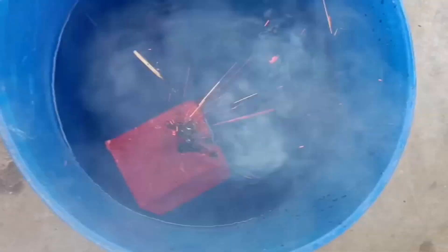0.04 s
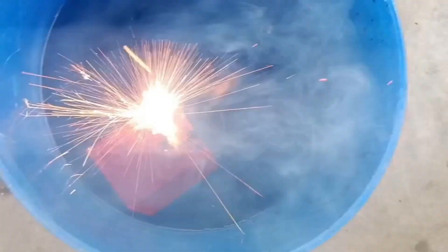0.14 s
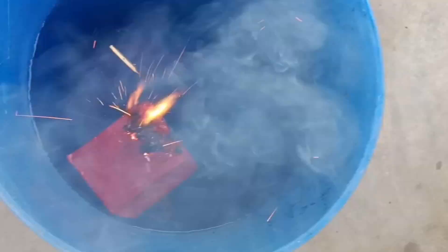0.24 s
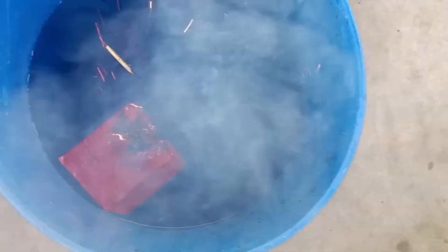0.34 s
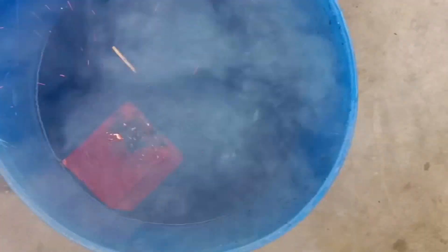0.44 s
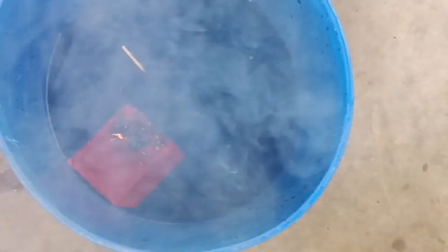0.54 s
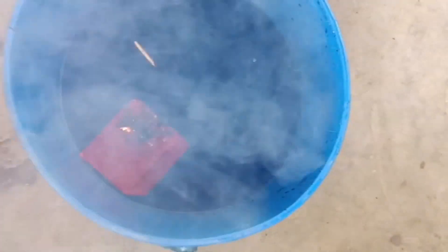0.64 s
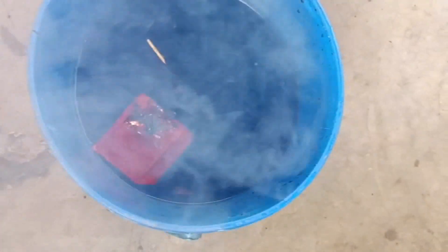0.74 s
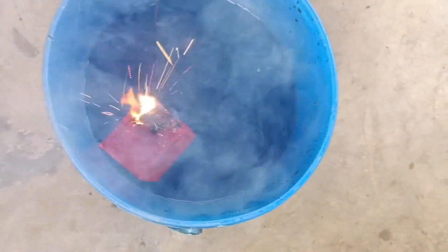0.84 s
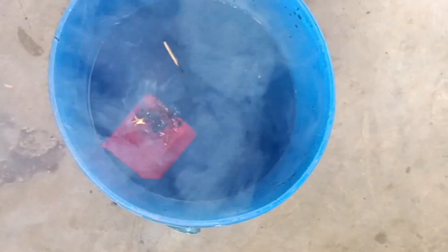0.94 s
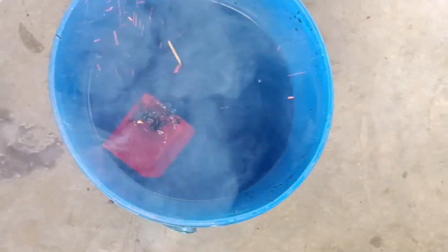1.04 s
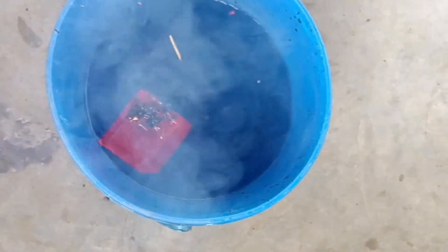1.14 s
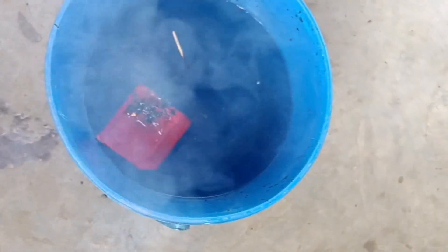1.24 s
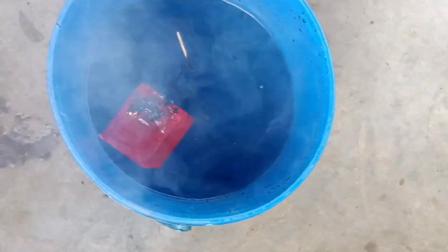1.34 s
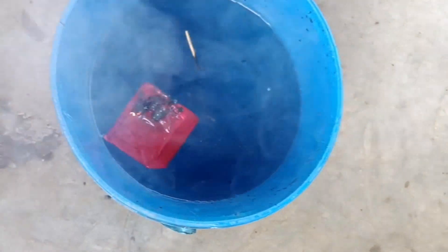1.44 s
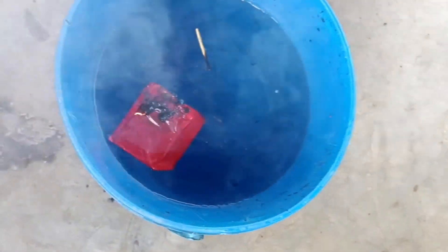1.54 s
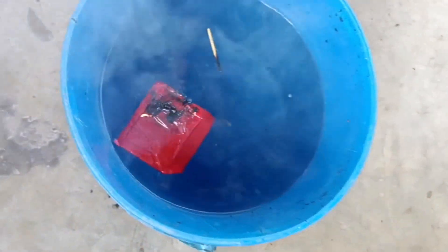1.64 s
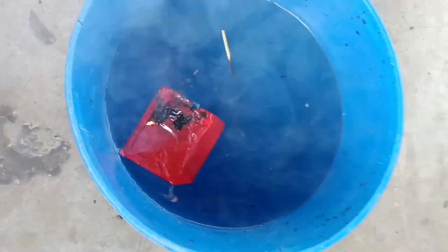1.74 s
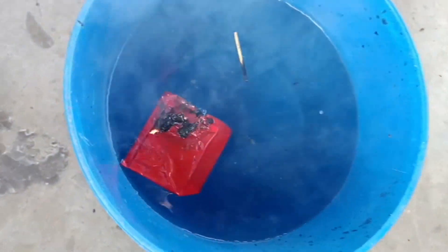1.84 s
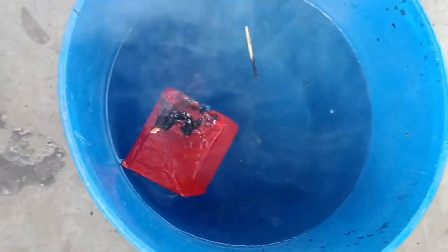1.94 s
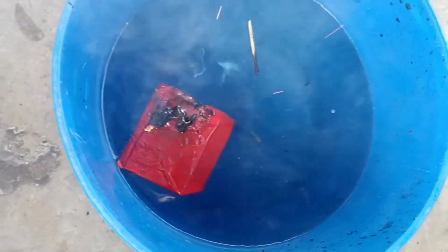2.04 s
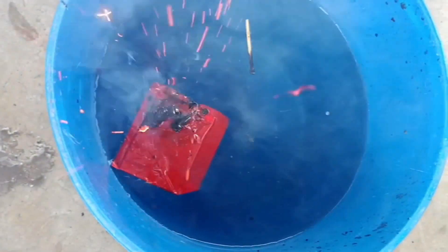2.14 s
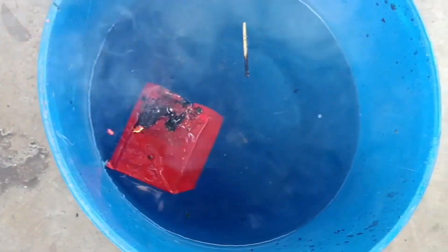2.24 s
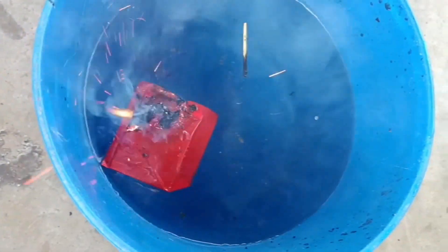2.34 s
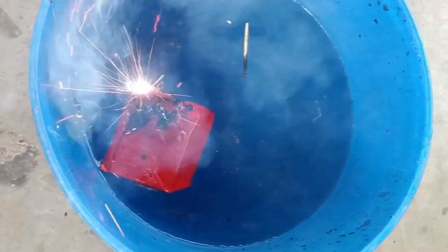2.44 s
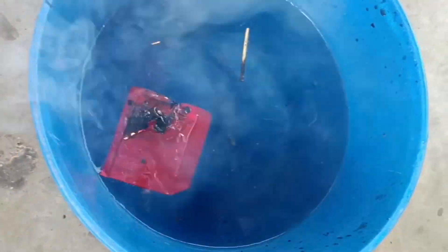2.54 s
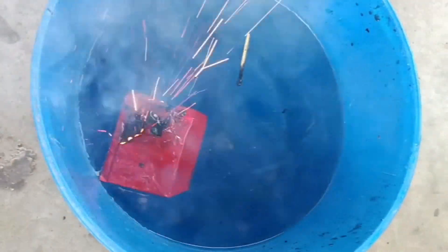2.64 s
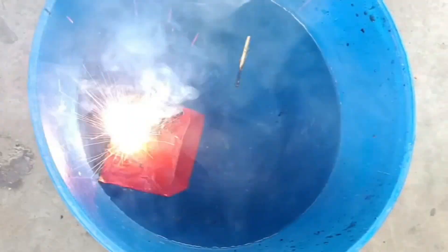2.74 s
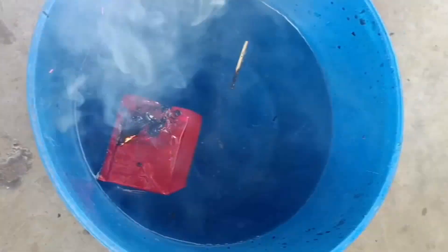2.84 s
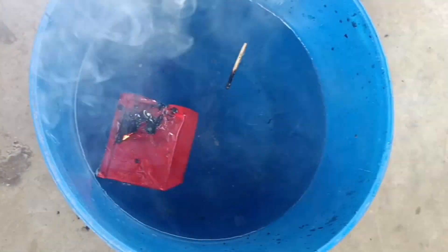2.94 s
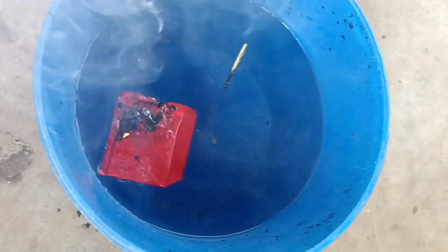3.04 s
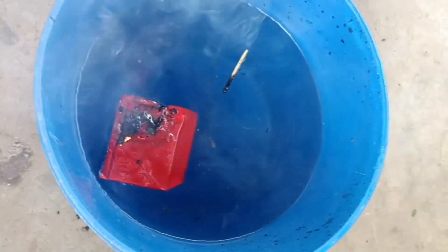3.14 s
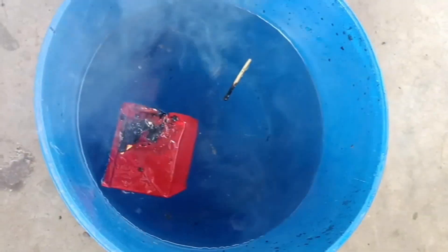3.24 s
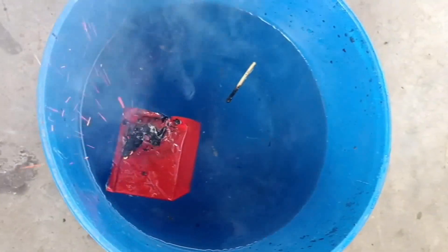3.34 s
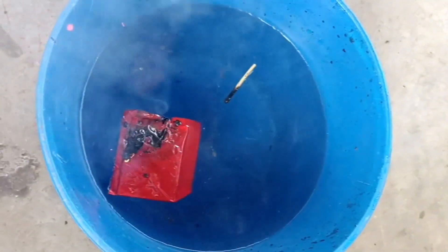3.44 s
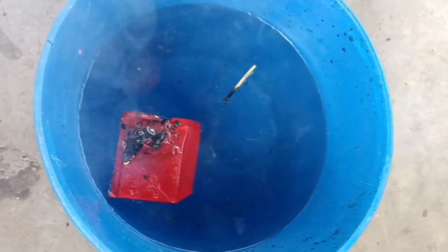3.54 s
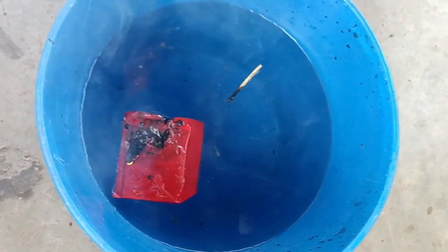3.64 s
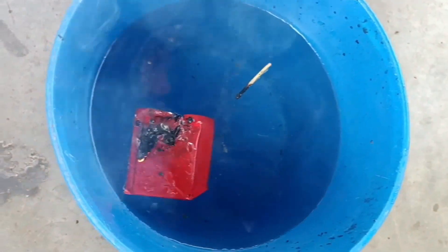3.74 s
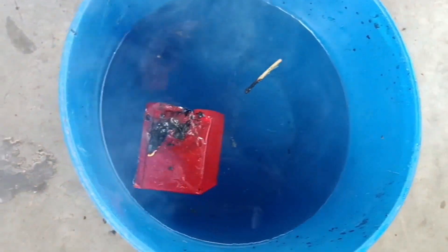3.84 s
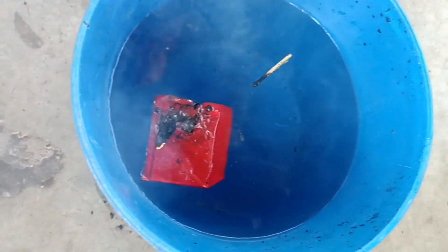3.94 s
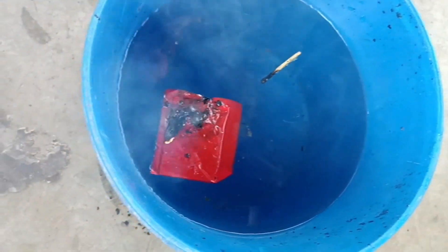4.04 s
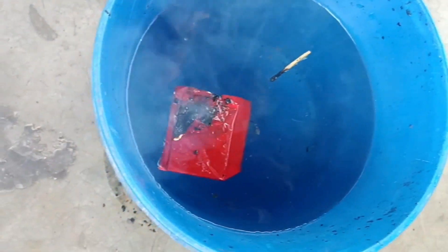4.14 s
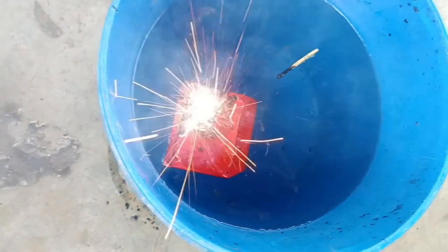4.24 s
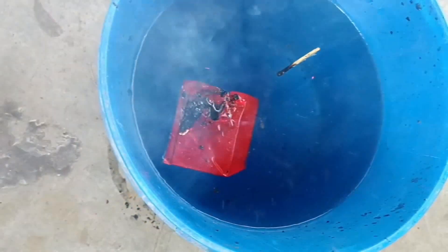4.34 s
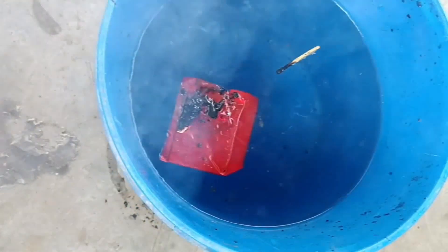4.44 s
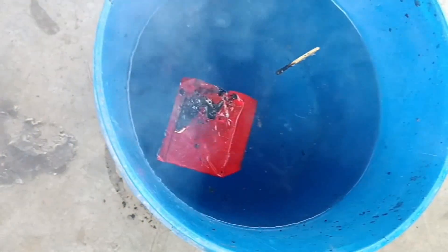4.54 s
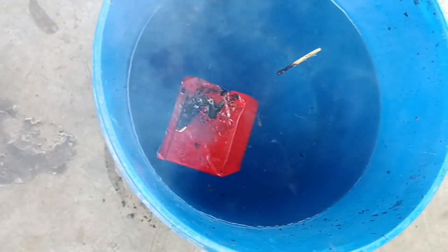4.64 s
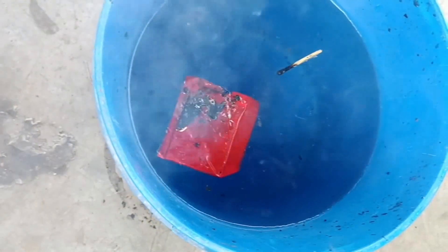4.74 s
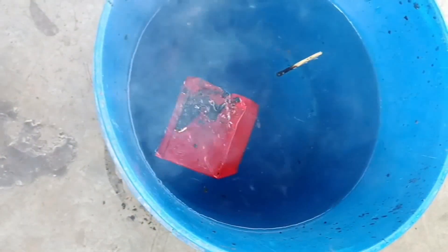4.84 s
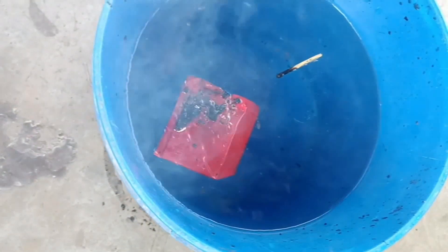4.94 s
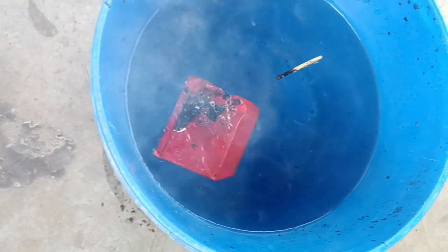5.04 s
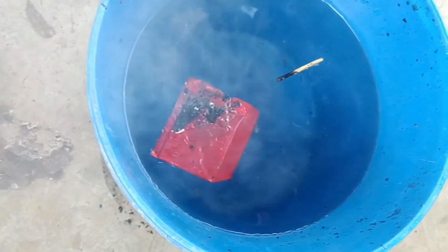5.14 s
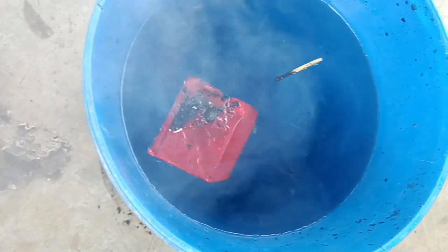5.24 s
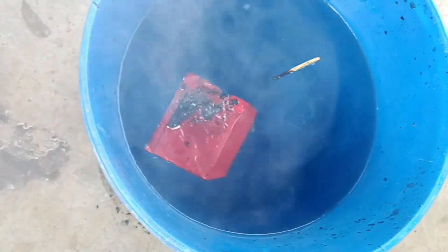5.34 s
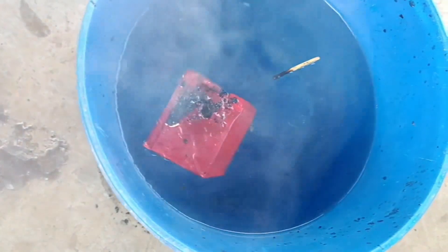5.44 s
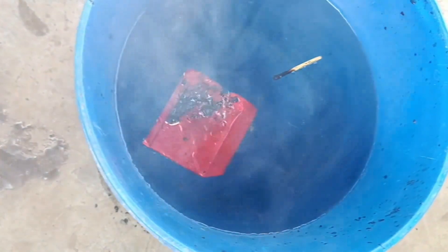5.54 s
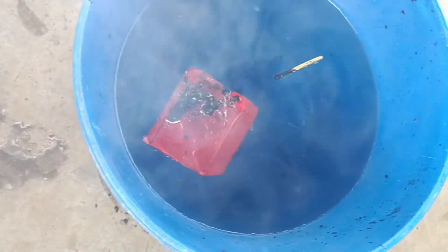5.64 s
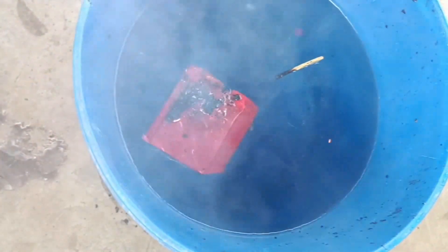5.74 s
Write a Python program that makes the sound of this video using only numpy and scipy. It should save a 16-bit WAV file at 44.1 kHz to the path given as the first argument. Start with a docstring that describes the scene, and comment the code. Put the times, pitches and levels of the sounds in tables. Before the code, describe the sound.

Small firecrackers bang and crackle irregularly in a plastic bucket of water, over a steady fizzing hiss and a brief faint burble.

```python
"""Firecrackers in a bucket of water

A box of small firecrackers burns while it floats in a plastic bucket outdoors. Dry charges bang and
make the bucket ring; damp ones only thud. The fuse hisses and snaps, flames jet from split casings,
gas burbles through the water and engines hum far away. The bangs overload the microphone, and its
limiter turns the sound down just ahead of each one."""
import sys
import numpy as np
from scipy import signal
from scipy.fft import rfft, irfft
from scipy.io import wavfile
from scipy.ndimage import uniform_filter1d, minimum_filter1d

SR = 44100
rng = np.random.default_rng(int(sys.argv[2]) if len(sys.argv) > 2 else 0)


def pcm_store(signal):
    """Save signal as 16-bit PCM."""
    levels = np.round(np.clip(np.atleast_2d(signal), -1, 1) * 32767)
    wavfile.write(sys.argv[1], SR, levels.astype(np.int16).T)


N = 255780
TIME = np.arange(N) / SR
SHOT = TIME[:SR * 2 // 7]  # the time axis of one short sound, in seconds

# dry charges: (time [s], level [dB], time to fade by 60 dB [s], thump of gas [relative dB],
# thump pitch [Hz], bucket ring [relative dB], knock pitch [Hz])
BANGS = [(0.1067, 18.5, 0.1, -4, 198, -5.5, 518), (0.3099, 6.5, .073, 8.5, 293, 11, 740),
         (0.4719, 18.5, 0.089, -8, 164, 1, 402), (.702, 20.5, 0.09, -10.5, 121, -14, 760),
         (1.1487, 13, 0.069, 6, 408, -5.5, 469), (2.2537, 14.5, 0.064, -0.5, 206, -15, 800),
         (2.557, 9.5, .11, -6, 200, -6.5, 408), (2.847, 11, 0.069, 3.5, 210, -0.5, 635),
         (3.482, 15, 0.061, -10, 128, -2, 700), (4.4073, 10, 0.075, 5.5, 151, 3.5, 636)]
# knots of powder snapping along the fuse: (time [s], puff level [dB], crack level [dB])
SNAPS = [(.031, -7, -19), (.035, 1, -19), (.04, 3.5, -11.5), (.057, 0, -6), (.2889, 13.5, -8),
         (0.4024, 2.5, -5.5), (.604, -4, -9), (1.0019, -6, -11), (1.0603, -3, -9), (1.8476, -35, -7.5),
         (2.1648, -9, -15.5), (2.18, 4.5, -11.5), (2.4665, -2.5, -8), (2.485, 3, -10), (2.515, -22, -9),
         (2.534, -11, -11), (2.545, -17, -9), (2.6582, -30, -11), (2.6871, -7, -5.5), (2.712, -4, -14.5),
         (2.7341, -9, -8), (2.7737, 7.5, -3.5), (2.7966, 16, -15), (2.838, -15, -2.5), (2.9156, 4, -14),
         (2.9458, -17, -12), (3.5967, -3, -10.5)]
# damp charges: (time [s], puff level [dB], puff pitch [Hz], crack level [dB])
THUDS = [(0.1971, 0.5, 142, -5), (.55, 4, 182, -.5), (.556, -3, 308, -4), (0.973, 0.5, 122, -5.5),
         (2.6091, 5, 197, -5), (2.799, 14.5, 139, 4.5)]
# flames from split casings: (start [s], time until it fades [s], level [dB], whistle pitch [Hz])
FLARES = [(0, 0.034, -37.5, 1500), (.74, 0.17, -28.5, 1680), (1.15, 0.052, -35, 1455),
          (2.26, .06, -45, 1420), (2.95, 0.44, -34.5, 1355)]
# gas forced through narrow gaps: (middle time [s], rough length [s], pitch [Hz], width [Hz], level [dB])
SPURTS = [(.882, 0.088, 2630, 900, -28), (1.36, .022, 3500, 3000, -35), (3.09, 0.11, 1350, 120, -34),
          (4.1, 0.5, 3600, 90, -47), (4.2, 0.24, 3260, 130, -46), (4.803, 0.34, 2560, 600, -43.5),
          (4.87, 0.051, 1030, 500, -38), (4.947, 0.045, 5630, 1100, -34.5), (5.44, 0.18, 2900, 500, -44)]
# notes at which the bucket's air and walls ring: (pitch [Hz], width [Hz], level [dB])
BUCKET_NOTES = [(252, 35, -9.5), (454, 50, -1), (578, 20, 2), (712, 67, -3), (1015, 12, -24),
                (1410, 110, -4.5), (2110, 190, -1), (2544, 125, -1.5), (2778, 200, -5.5), (3370, 90, 1.5),
                (4140, 220, 1.5), (7350, 64, -1.5)]
# notes in the hum of distant engines: (pitch [Hz], width [Hz], level [dB])
ENGINE_NOTES = [(67, 11, 1), (96.6, 12, 3), (202, 36, -12.5), (257.5, 14, -8)]

# the tone of each sound, from bass to treble: (frequency [Hz], gain [dB])
BANG_COLOUR = [(40, -2), (90, -1.5), (160, -5), (330, -3), (700, 1), (1400, 1), (3000, 0.5), (6000, 1),
               (15000, -8)]
CRACK_COLOUR = [(60, -38), (300, -12), (700, 3.5), (1400, -0.5), (2300, 1), (5000, -6), (8500, 0),
                (15000, -1.5)]
SHOWER_COLOUR = [(2000, 5), (6000, 8), (10000, 6), (14000, 5.5)]
SIZZLE_COLOUR = [(40, 5.5), (150, 5), (330, -5), (700, 4.5), (1400, -1), (2100, -1), (2600, 0.5),
                 (3400, -4.5), (4800, -1.5), (8000, -6), (15000, -2.5)]
FIZZ_COLOUR = [(300, -21), (3000, -50), (6500, -10), (8300, 3.5), (10500, -0.5), (15000, 7)]
FLARE_COLOUR = [(100, -15), (400, -2.5), (900, -2), (1400, 4), (2200, -3.5), (4000, -9), (8000, -7),
                (15000, -42)]
# how the microphone's opening shapes the tone: (frequency [Hz], gain [dB])
MICROPHONE_COLOUR = [(25, -13.5), (100, 0), (700, -3.5), (1200, -4), (2100, -0.5), (3100, -1.5),
                     (3800, -8.5), (5300, -13.5), (6800, -8), (8100, -3.5), (9000, -6.5), (10200, -11),
                     (15500, -16.5)]


def bangs(yard_db=-30, yard_t60=0.48, build_s=0.00063, blast_db=-1, knock_db=-3, knock_t60=0.032):
    """A shock bounces between water and wall and rings the bucket; the yard returns a faint tail."""
    direct, into_bucket = np.zeros((2, 2, N))
    for start, db, t60, thump_db, thump_hz, bucket_db, knock_hz in BANGS:
        decay = fade(t60) + undb(yard_db) * fade(yard_t60)
        shock = clang(spacing_hz=149.9, ring_db=0, side_db=-6) * decay
        shock *= 1 - np.exp(-SHOT / build_s)  # the echoes take a moment to pile up
        thump = 2 * undb(thump_db) * puff(thump_hz, cycles=0.36)
        blast = undb(blast_db) * puff(1.039 * knock_hz, cycles=2.05)
        # the air above the water gives a short hollow knock
        knock = undb(knock_db) * np.sin(2 * np.pi * knock_hz * SHOT) * fade(knock_t60) / 2
        add(direct, start, undb(db) * (shock + thump + blast + knock))
        add(into_bucket, start, undb(db + bucket_db) * shock)
    return colour(direct + resonate(into_bucket, BUCKET_NOTES), BANG_COLOUR)


def snaps_and_thuds(snap_hz=680, ring_db=-9.5, ring_db_per_octave=4, click_hz=5000, click_delay_s=0.00046):
    """Powder knots and damp charges each give a soft puff, a sharp crack and a shower of sparks."""
    puffs, cracks, showers = np.zeros((3, 2, N))
    snaps = [(start, puff_db, snap_hz * rng.uniform(0.67, 1.41), crack_db)
             for start, puff_db, crack_db in SNAPS]
    for start, puff_db, hz, crack_db in snaps + THUDS:
        add(puffs, start, undb(puff_db + 2) * puff(hz, cycles=0.34))
        # the deeper the puff, the more it rings the bucket
        ring = undb(ring_db + ring_db_per_octave * np.log2(snap_hz / hz)) * fade(t60=0.13)
        crack = clang(spacing_hz=320.4, ring_db=1.5, side_db=-34) * (2 * fade(t60=0.01) + ring)
        add(cracks, start, undb(crack_db - 3) * crack)
        click = puff(click_hz * rng.uniform(0.69, 1.5), cycles=0.22)  # the steep front of the wave
        add(cracks, start + click_delay_s, undb(crack_db + 13) * click)
        shower = noise(len(SHOT), side_db=-9) * fade(t60=0.098)
        add(showers, start, undb(crack_db - 11) * shower)
    cracks = colour(cracks, CRACK_COLOUR)
    bucket = resonate(cracks + undb(-4) * puffs, BUCKET_NOTES)
    return puffs + cracks + bucket + colour(showers, SHOWER_COLOUR)


def puff(hz, cycles):
    """A ball of gas swells too far, shrinks and settles; we hear the change in its outward flow."""
    turns = hz * SHOT
    outflow = (1 - np.exp(-2 * np.pi * turns)) * np.sin(2 * np.pi * turns) * np.exp(-turns / cycles)
    return np.gradient(outflow) * SR / (2 * np.pi * hz)


def clang(spacing_hz, ring_db, side_db):
    """Crowded echoes plus random wall notes, different for every spot where a charge goes off."""
    chance, phase = rng.random((2, len(SHOT) // 2 + 1))
    wall_notes = (chance < SR / len(SHOT) / spacing_hz) * np.exp(2j * np.pi * phase)
    return unit(noise(len(SHOT), side_db) + undb(ring_db) * unit(irfft(wall_notes)))


def fuse(sizzle_db=-37, fizz_db=-35, fizz_growth_db_per_s=0.05, sputter_db=2.43, stir_db=4, settle_s=0.06):
    """Wet powder sizzles in the bucket under a bright fizz; each bang briefly stirs up the sizzle."""
    sizzle = colour(noise(N, side_db=-13), SIZZLE_COLOUR)
    sizzle = unit(sizzle + undb(-6) * resonate(sizzle, BUCKET_NOTES))
    bright = fizz()
    stirred = sum((TIME > start) * np.exp(-np.abs(TIME - start) / settle_s) for start, *_ in BANGS)
    sizzle *= undb(sizzle_db + stir_db * stirred + sputter_db * wander(60))
    bright *= undb(fizz_db + fizz_growth_db_per_s * TIME + sputter_db * wander(35))
    return sizzle + bright


def fizz(sparks_per_s=90, flutter_db=3, top_hz=9500, dulling_db_per_s=1.2):
    """The fuse spits sparks over a high hiss, whose top dulls as the powder burns down."""
    # most sparks are tiny, a few stand out; each is a very short hiss
    fires = rng.random(N) < sparks_per_s / SR
    strength = undb(4 + 3.5 * np.minimum(rng.exponential(size=N), 4))
    spit = rng.standard_normal(len(SHOT)) * fade(t60=0.02)
    sparks = signal.fftconvolve(fires * strength, spit / np.linalg.norm(spit))[:N]
    jets = 0
    for hz in np.geomspace(3000, 15000, 12):  # each band flutters by itself
        band = resonate(rng.standard_normal((1, N)), [(hz, hz / 8, 0)])
        jets = jets + band * undb(flutter_db * wander(22))
    hiss = colour(unit(jets) + sparks, FIZZ_COLOUR)
    top = signal.sosfiltfilt(signal.butter(3, top_hz, "high", fs=SR, output="sos"), hiss)
    return unit(hiss + (undb(-dulling_db_per_s * TIME) - 1) * top)


def flares(smoulder_db=-43, rise_s=0.026, fade_db_per_s=30.5, flicker_db=2.5,
           whistle_db=-9, eddy_hz=60, sag_hz_per_s=70):
    """Flames rush up, hold and die down; each whistle sinks as the casing's mouth burns wider."""
    rush = colour(rng.standard_normal((1, N)), FLARE_COLOUR)
    rush = unit(rush + undb(-2) * resonate(rush, BUCKET_NOTES))
    slow_noise = signal.sosfilt(signal.butter(2, eddy_hz, fs=SR, output="sos"), rng.standard_normal((2, N)))
    eddies = slow_noise[0] + 1j * slow_noise[1]  # swirls that make the whistle breathy
    power, whistles = undb(smoulder_db) ** 2, 0
    for start, hold, db, hz in FLARES:
        age = TIME - start
        flow = np.clip(age / rise_s, 0, 1) * undb(db - fade_db_per_s * np.maximum(age - hold, 0))
        turns = np.cumsum(hz - sag_hz_per_s * age) / SR
        whistles = whistles + flow * unit(np.real(eddies * np.exp(2j * np.pi * turns)))
        power = power + flow ** 2
    return (rush * np.sqrt(power) + undb(whistle_db) * whistles) * undb(flicker_db * wander(30))


def spurts():
    """Gas squeezes through gaps in the casings; each hisses at its own pitch, swells and dies away."""
    out = np.zeros((2, N))
    for middle, length, hz, width, db in SPURTS:
        gap = [(hz, width, 0)]
        jet = unit(resonate(resonate(rng.standard_normal(N), gap), gap))
        out += undb(db) * jet * np.exp(-2 * ((TIME - middle) / length) ** 2)
    return out


def burble(start_s=3.615, length_s=0.75, count=320, low_hz=185, octaves=2.35, cycles=5.9,
           start_db=-30.5, fade_db_per_s=28.5, gulps_per_s=7.9, gulp_db=2.5):
    """Gas escapes under water in ever weaker gulps; each bubble rings and rises in pitch."""
    bubbles = np.zeros((2, N))
    for when, smallness in rng.random((count, 2)):
        # big, low bubbles are the most common and ring the longest
        hz = low_hz * 2 ** (octaves * smallness ** 1.33)
        bubble = np.sin(2 * np.pi * hz * SHOT * (1 + 0.94 * SHOT)) * np.exp(-hz * SHOT / cycles)
        add(bubbles, start_s + when * length_s, bubble)
    age = np.maximum(TIME - start_s, 0)
    level_db = start_db - fade_db_per_s * age + gulp_db * np.cos(2 * np.pi * gulps_per_s * age)
    return unit(bubbles) * np.sqrt(length_s / TIME[-1]) * undb(level_db)


def distant_engines(level_db=-46, swell_db=1):
    """Far engines hum low, drifting a little in level."""
    hum = resonate(rng.standard_normal(N), ENGINE_NOTES)
    hum = resonate(hum, [(hz, 2 * width, 0) for hz, width, _ in ENGINE_NOTES])  # trims stray hiss
    return unit(hum) * undb(level_db + swell_db * wander(4.2))


def undb(db):
    """Turn decibels into a number to multiply by."""
    return 10 ** (np.asarray(db) / 20)


def unit(x):
    """Scale a sound to an average power of one."""
    return x / np.sqrt(np.mean(x ** 2))


def fade(t60):
    """A smooth decay that falls by 60 dB in t60 seconds."""
    return np.exp(-np.log(1000) * SHOT / t60)


def add(out, start_s, x):
    """Mix the sound x into out at the given time."""
    i = max(int(start_s * SR), 0)
    out[:, i:i + x.shape[-1]] += x[..., :N - i]


def colour(x, points, size=4096):
    """Shape the tone along a curve of (frequency [Hz], gain [dB]) points."""
    hz, db = np.transpose(points)
    log_hz = np.log(np.fft.rfftfreq(size, 1 / SR) + 1)
    log_gain = np.log(undb(np.interp(log_hz, np.log(hz), db)))
    # keeping one half, doubled, makes a filter that never rings before the sound arrives
    cepstrum = irfft(log_gain)[:size // 2]
    cepstrum[1:] *= 2
    taps = irfft(np.exp(rfft(cepstrum, size)))[:size // 2]
    return signal.fftconvolve(x, taps[None], axes=-1)[:, :x.shape[-1]]


def resonate(x, notes):
    """Let x ring at each note: (pitch [Hz], width [Hz], level [dB])."""
    return sum(undb(db) * signal.lfilter(*signal.iirpeak(hz, hz / width, fs=SR), x)
               for hz, width, db in notes)


def noise(count, side_db, split_hz=7500):
    """Stereo hiss; only the treble differs between left and right."""
    mid, side = rng.standard_normal((2, count))
    side = undb(side_db) * signal.sosfilt(signal.butter(4, split_hz, "high", fs=SR, output="sos"), side)
    return np.array([mid + side, mid - side])


def wander(steps_per_s):
    """A smooth random drift, mostly between -1 and 1."""
    step = int(SR / steps_per_s)
    stairs = np.repeat(rng.standard_normal(N // step + 1), step)
    return unit(uniform_filter1d(stairs, step))[:N]


def limiter(x, ceiling_db, ahead_s=0.027, ramp_s=0.0047, release_db_per_s=190):
    """Look ahead, turn the sound down before a peak and let it climb back."""
    peak_db = 20 * np.log10(np.abs(x).max(axis=0) + 1e-9)
    over_db = np.maximum(peak_db - ceiling_db, 0)
    ahead = int(ahead_s * SR)
    coming_db = -minimum_filter1d(-over_db, ahead, origin=-(ahead // 2))
    climb = release_db_per_s * TIME
    cut_db = np.maximum.accumulate(coming_db + climb) - climb
    return x * undb(-uniform_filter1d(cut_db, int(ramp_s * SR)))


def scene():
    """Everything in and around the bucket."""
    return bangs() + snaps_and_thuds() + fuse() + flares() + spurts() + burble() + distant_engines()


def record(dry, overload_db=13, top_hz=15800):
    """The microphone overloads, its opening colours the sound and its limiter ducks the bangs."""
    overloaded = undb(overload_db) * np.tanh(dry / undb(overload_db))
    limited = limiter(colour(overloaded, MICROPHONE_COLOUR), ceiling_db=4)
    rounded = limited / (1 + limited ** 4) ** (1 / 4)  # rounds off the tallest peaks
    return signal.sosfilt(signal.ellip(8, .2, 70, top_hz, fs=SR, output="sos"), rounded)


dry = scene()
out = record(dry)
pcm_store(out)
```